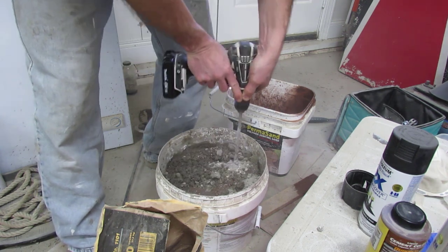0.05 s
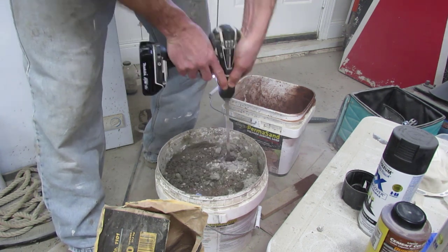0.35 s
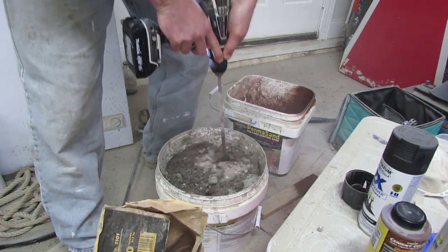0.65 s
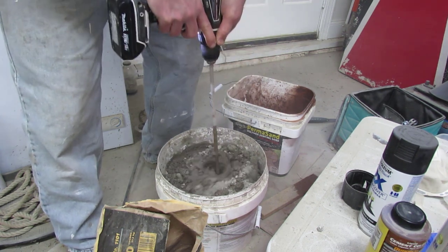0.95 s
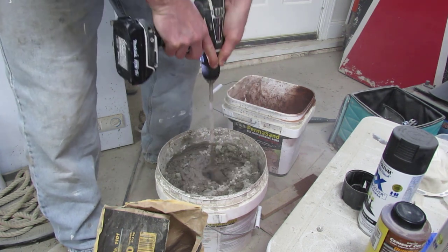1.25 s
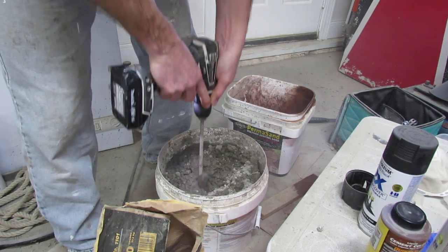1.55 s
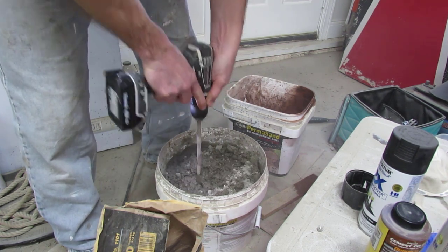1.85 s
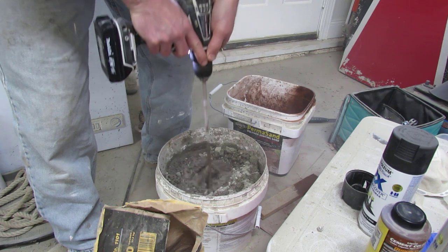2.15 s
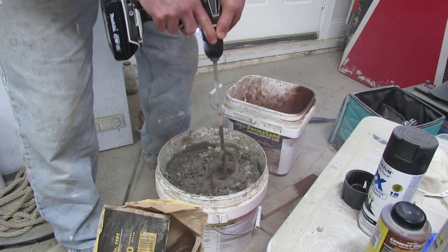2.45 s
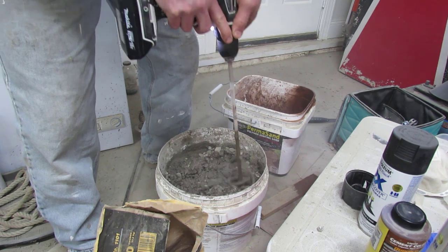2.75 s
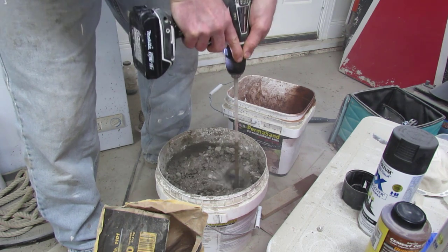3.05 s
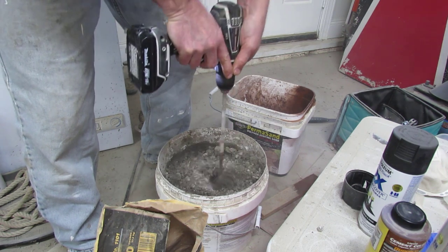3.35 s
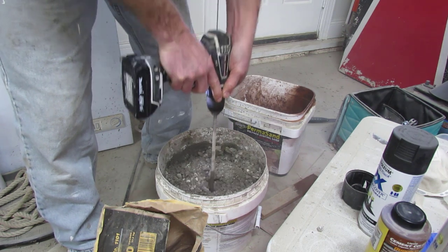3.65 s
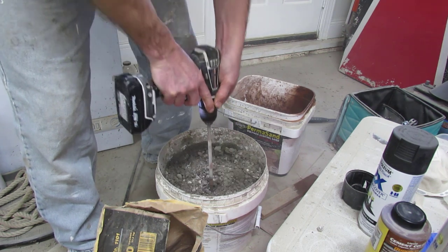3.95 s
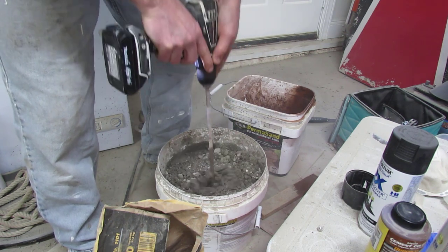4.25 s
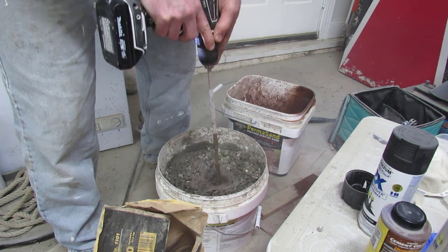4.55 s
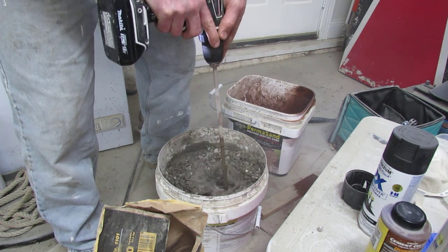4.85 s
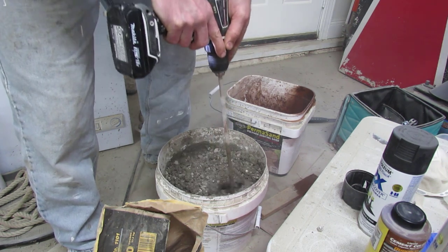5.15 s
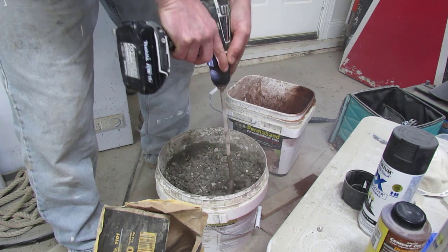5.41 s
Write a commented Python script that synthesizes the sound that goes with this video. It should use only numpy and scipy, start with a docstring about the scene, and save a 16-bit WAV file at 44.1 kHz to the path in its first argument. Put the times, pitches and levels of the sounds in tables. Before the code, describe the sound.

Wet concrete churns in a plastic bucket as a drill's gear whine rises and sags, with occasional paddle knocks and scrapes.

```python
"""A cordless drill turns a mixing paddle through wet concrete in a plastic bucket, in a garage.
Its gear teeth whine and rattle, rising and sagging with the trigger and the drag of the mix.
At part throttle the speed control chops the current, so the motor buzzes at a steady pitch.
Gravel churns, the bucket rumbles, and the paddle knocks and scrapes against the bucket wall.
The garage adds a short echo and a faint hum."""
import sys
import numpy as np
from scipy import signal
from scipy.io import wavfile
from scipy.ndimage import uniform_filter1d

SR = 44100
rng = np.random.default_rng(int(sys.argv[2]) if len(sys.argv) > 2 else 0)


def inscribe(sig):
    """Save sig as 16-bit PCM at rate SR to the path in sys.argv[1].

    A 1-D sig is mono; a 2-D sig holds one channel per row.
    Samples are clipped to [-1, 1] before scaling.
    """
    pcm = np.round(np.clip(np.atleast_2d(sig).T, -1, 1) * 32767)
    wavfile.write(sys.argv[1], SR, pcm.astype(np.int16))


N = 246078
TIME = np.arange(N) / SR

# The tone colour of four noises. Each row: frequency in Hz, level in dB.
AIR_SPECTRUM = [(30, 1.5), (90, -19), (150, 9.5), (330, -22), (1000, -3), (2200, -3), (8500, -37),
                (15000, -47)]
RUMBLE_SPECTRUM = [(30, -14), (70, -25), (140, 2.5), (290, 3.5), (450, 8), (800, 1), (2000, -29)]
CHURN_SPECTRUM = [(250, -34), (450, -23), (720, -1), (1000, 1), (1500, 3.5), (2000, 5), (3000, 0),
                  (5000, -5), (10000, -31)]
RATTLE_SPECTRUM = [(500, -22), (1200, -4.5), (2400, -4), (3150, 0), (3800, -3), (4700, -0.5), (5500, 0),
                   (6600, -0.5), (8000, -1.5), (9500, -4.5), (12500, -11), (15500, -18.5)]
# How alike left and right are. Each row: frequency in Hz, likeness (1 is identical).
STEREO_LIKENESS = [(40, 0.14), (120, 0.82), (1000, 0.95), (2200, 0.59), (4500, 0.73), (12000, 0.75)]
# Resonances of the housing and the bucket's mouth. Each row: frequency in Hz, boost in dB, sharpness (Q).
RESONANCES = [(542, -0.5, 7.2), (765, 3, 6.8), (940, -1, 4), (1170, -0.5, 8.8), (2050, -1, 7),
              (2320, 0, 8.1), (3960, -0.5, 7)]

# The ringing notes (modes) of the bucket wall, the filled bucket and the steel blade.
# Each row: pitch in Hz, level in dB, seconds to fade by 60 dB.
WALL_MODES = [(650, -5.5, 0.018), (1072, -4, 0.0098), (1444, -4, 0.039), (2050, -22, 0.0062),
              (3170, -8.5, 0.017)]
BODY_MODES = [(170, 5.5, 0.11), (274, -8.5, 0.057), (464, -20, 0.15)]
BLADE_MODES = [(1034, -2, 0.036), (1248, -2, 0.032), (2780, -10, 0.039)]
# A deep blow favours other notes. One change in dB for each body mode, at full depth.
DEEP_BLOW_CHANGES = [-13, 9, 16]
# The paddle hits the wall. Each row: time in seconds, then crunch, wall ring and thump in dB.
WALL_KNOCKS = [(0.055, -30, -34, -35), (0.165, -26.5, -48, -36), (1.663, -24, -33, -30),
               (1.678, -25.5, -31, -32), (1.722, -26, -33, -40), (1.736, -27, -22, -28),
               (1.751, -21, -19.5, -26.5), (1.778, -32.5, -36, -48), (2.66, -27, -36, -45),
               (2.67, -17, -27, -33), (2.713, -21.5, -33, -55.5), (2.753, -24.5, -30, -54),
               (2.761, -24, -41, -56), (2.797, -23, -32, -52), (3.29, -28, -23.5, -55),
               (3.837, -38.5, -43, -24.5), (3.856, -32, -24.5, -40), (3.868, -25, -26, -47),
               (5.198, -25, -38, -41), (5.31, -22, -19, -46), (5.319, -29.5, -22, -50),
               (5.397, -33, -21, -45), (5.474, -30, -19, -45), (5.496, -29, -23, -46),
               (5.522, -21.5, -34, -46)]
# The paddle drags along the wall. Each row: start and end in seconds, level in dB.
WALL_DRAGS = [(2.934, 2.946, -29), (3.29, 3.335, -38), (5.337, 5.582, -28.5)]
# A stone catches the blade. Each row: time in seconds, level in dB.
BLADE_CLANKS = [(2.667, -27), (2.758, -18.5), (2.779, -29), (5.308, -29)]
# The paddle digs into gravel. Each row: start and end in seconds, then extra gearbox, churn, rumble in dB.
GRAVEL_DIGS = [(0, 0.19, 0.5, 4, 3.5), (1.667, 1.75, 5, 8, 9), (3.84, 3.87, 1.5, 6, 7.5),
               (5.066, 5.199, 0.5, 4, 8), (5.312, 5.58, -2.5, 2, 5)]
# How deep the paddle is held. Each row: time in seconds, depth from 0 to 1.
PADDLE_DEPTH = [(0, 1), (.7, 0.1), (1.15, 0.15), (1.5, 0.84), (1.9, 1), (2.55, 0.02), (3.1, 0.26),
                (3.7, 0.84), (4.2, 0.72), (4.7, 0.1), (5.3, .1), (5.58, 0.89)]
# The drag of the mix on the paddle. Each row: time in seconds, load in dB.
MIX_LOAD = [(0, 0.5), (.42, -6), (.84, -1.5), (.98, -1.5), (1.22, 1), (1.7, -2), (1.86, -4.5),
            (1.98, -10.5), (2.05, -9), (2.1, 0), (2.55, 2.5), (3.22, 1.3), (3.36, -1.5), (3.78, -2.5),
            (4.08, 0), (4.55, 2), (5.15, 5), (5.58, 8)]

# Motor speed, set by the trigger. Each row: time in seconds, pitch of the gear whine in Hz.
MOTOR_SPEED = [(0, 2500), (.11, 1748), (.2, 2510), (.25, 1353), (.53, 1148), (.8, 1633), (1.11, 1745),
               (1.16, 2082), (1.2, 2593), (1.42, 2860), (1.5, 3065), (1.665, 3130), (1.7, 2464),
               (1.83, 2350), (1.86, 2007), (1.93, 1104), (2.0, 593), (2.05, 799), (2.1, 1485), (2.58, 1655),
               (2.73, 1982), (2.99, 1750), (3.015, 2315), (3.13, 2300), (3.18, 2956), (3.24, 3144),
               (3.27, 2974), (3.38, 3006), (3.46, 3275), (3.56, 3139), (3.81, 3117), (3.84, 2620),
               (3.875, 2395), (3.9, 2686), (3.96, 2300), (4.02, 2240), (4.07, 1521), (4.24, 1615),
               (4.28, 2128), (4.6, 2266), (4.9, 2243), (5.06, 2106), (5.13, 1802), (5.29, 1725),
               (5.58, 1510)]
# The motor's buzz. One level in dB for each harmonic, from the second upwards.
BUZZ_HARMONICS = [-16, -14, -3.5, -14, -7.5, -1, -14]
# How strong the whine is. Each row: time in seconds, dB relative to the gearbox level.
WHINE_LEVELS = [(0, -4.5), (.1, -14), (.19, -8), (.33, -18), (.6, -8), (.8, -4.5), (1.02, -10), (1.12, -11),
                (1.25, -10), (1.62, -8), (1.73, -5), (1.82, -1), (1.89, -5), (2.1, -17), (2.5, -6.5),
                (2.65, -14), (2.8, -12), (2.91, -4), (2.95, 2), (2.99, -8), (3.03, -6), (3.12, -4),
                (3.2, -5), (3.25, 2.5), (3.29, 0), (3.5, -4), (3.58, -0.5), (3.8, -3), (3.98, -4.5),
                (4.13, -3.5), (4.3, -3.5), (4.44, -6), (4.5, -9), (4.66, -7), (4.88, -7.5), (5.04, -6),
                (5.11, -10), (5.17, -3), (5.28, 3), (5.33, -1), (5.45, 1), (5.52, -13), (5.58, -0.5)]
# Low gear tones. Each row: multiple of the whine's pitch, dB relative to the gearbox level at full speed.
GROWL_TONES = [(.2, -26.5), (.255, -20)]
# Gear tones that sing out for a while.
# Each row: start and end in seconds, multiple of the whine's pitch, dB relative to the gearbox level.
SINGING_TONES = [(0.681, .95, .93, -7), (0.85, 1.029, 2, -14), (.8, 1.08, 2.78, -15),
                 (1.185, 1.557, .5, -12), (1.46, 1.65, .25, -15), (1.219, 1.444, 1.45, -12.5),
                 (1.319, 1.439, 2, -7), (1.49, 1.667, 1.53, -6), (1.781, 1.85, 2.42, -13),
                 (2.119, 2.601, .5, -21), (3.192, 3.796, 1.5, -13), (3.197, 3.383, .57, -12.5),
                 (3.2, 3.4, 2.2, -22), (3.406, 3.53, .525, -8), (3.416, 3.548, 2.1, -5.5),
                 (3.556, 3.82, .5, -5.5), (3.583, 3.801, 2, -10.5), (3.595, 3.737, .2, -12),
                 (4.399, 4.445, .5, -8.5), (4.5, 4.851, .49, -19), (4.499, 4.999, 1.47, -17),
                 (4.502, 4.972, 1.96, -11), (4.5, 4.92, 2.46, -11.5)]

FULL_SPEED_HZ, CHOP_HZ = 3100, 116.2  # the whine at full speed; how often the current is chopped
WHINE_PER_GEAR_PULSE = 32  # whine cycles in one pulse of the gears (a turn of the gear carrier)
WHINE_PER_PADDLE_TURN = 136
SCRAPE_S = 0.0051  # how quickly a knock's scrape rises and fades


def from_db(db):
    """Turn decibels into a gain."""
    return np.exp(np.asarray(db) * (np.log(10) / 20))


def rms_one(x):
    """Scale a signal to an average power of 1."""
    return x / np.sqrt(np.mean(np.abs(x) ** 2) + 1e-20)


def in_time(rows):
    """Join (seconds, value) points into a value for every sample."""
    return np.interp(TIME, *np.transpose(rows))


def at_hz(points, hz):
    """Read between (Hz, value) points, with octaves evenly spaced."""
    f, value = np.transpose(points)
    return np.interp(np.log(hz), np.log(f), value)


def filtered(x, order, hz, kind):
    """Keep the low part, the high part or one band of a sound."""
    return signal.sosfilt(signal.butter(order, hz, kind, fs=SR, output="sos"), x)


def drift(rate):
    """A smooth random wander of about 1, changing about `rate` times a second."""
    step, warm_up = 20, 4000  # samples per point; points thrown away
    r = np.exp(-2 * np.pi * step * rate / SR)
    slow = signal.lfilter([1], [1, -2 * r, r * r], rng.standard_normal(N // step + warm_up + 2))[warm_up:]
    return np.interp(np.arange(N) / step, np.arange(len(slow)), rms_one(slow))


def swell(start, end, attack_s, release_s):
    """A level that rises to 1 at `start`, holds until `end` and dies away."""
    return np.exp(np.minimum(TIME - start, 0) / attack_s - np.maximum(TIME - end, 0) / release_s)


def spread(mid, side, alike):
    """Make left and right from a shared signal and one they take with opposite signs."""
    return np.sqrt(1 + alike) * mid + np.sqrt(1 - alike) * side * np.array([[1], [-1]])


def coloured_noise(spectrum, bands, force=1, flicker_db=0):
    """Stereo noise that follows a contact force, built from bands that can each flicker."""
    out = np.zeros((2, N))
    white = rng.standard_normal((2, 2, N)) * force
    edges = np.geomspace(spectrum[0][0], spectrum[-1][0] * 1.1, bands + 1)
    for k, (low, high) in enumerate(zip(edges, edges[1:])):
        hz = np.sqrt(low * high)
        alike = at_hz(STEREO_LIKENESS, hz)
        band = filtered(white[k % 2], 2, [low, high], "band") * np.sqrt([[1 + alike], [1 - alike]])
        flicker = flicker_db * drift(13) if flicker_db else 0
        out += band * from_db(at_hz(spectrum, hz) + flicker)
    return rms_one(spread(*out, alike=0))


def contacts(per_s, size_db, length_s, smooth):
    """The force of many tiny random hits of uneven size, on top of some smooth sliding."""
    sizes = from_db(size_db * np.minimum(rng.exponential(1, N), 4))
    hits = rng.random(N) < per_s / SR
    energy = signal.lfilter([1], [1, -np.exp(-1 / (length_s * SR))], hits * sizes ** 2)
    return np.sqrt(smooth + energy / energy.mean())


def taps(rows):
    """One clean blow for each (seconds, dB), as strong as a whole scrape of that level."""
    force = np.zeros(N)
    for s, db in rows:
        force[int(s * SR)] += from_db(db) * np.sqrt(SCRAPE_S * SR)
    return force


def ring(force, modes):
    """A force sets an object ringing: each mode is a note that fades."""
    out = 0
    for k, (hz, db, t60) in enumerate(modes):
        r, w = np.exp(-np.log(1000) / (t60 * SR)), 2 * np.pi * hz / SR
        note = signal.lfilter([0, np.sin(w) * np.sqrt(1 - r * r)],
                              [1, -2 * r * np.cos(w), r * r], force + 1e-18)
        out = out + (-1) ** k * from_db(db) * note
    return out


def resonate(x):
    """The housing and the bucket's mouth lift or dip a few narrow bands."""
    for hz, db, q in RESONANCES:
        w, gain = 2 * np.pi * hz / SR, from_db(db / 2)
        width, centre = np.sin(w) / (2 * q), -2 * np.cos(w)
        x = signal.lfilter([1 + width * gain, centre, 1 - width * gain],
                           [1 + width / gain, centre, 1 - width / gain], x)
    return x


def garage_air():
    """The quiet air of the garage, with a faint low hum."""
    hum = from_db(-71.5) * np.sin(2 * np.pi * 49 * TIME + .5 * drift(2))
    air = from_db(-47) * coloured_noise(AIR_SPECTRUM, bands=11)
    return (hum + air) * from_db([[.5], [-.5]])  # a little to the left


def garage_echo(x, t60):
    """Sound bounces between walls: six repeating echoes a side, fading by 60 dB in `t60` seconds."""
    out = np.zeros((2, N))
    for k, lag in enumerate((rng.uniform(.011, .045, 12) * SR).astype(int)):
        loop = x[k % 2].copy()
        gain = np.exp(-np.log(1000) * lag / SR / t60)
        for i in range(lag, N, lag):
            loop[i:i + lag] += gain * loop[i - lag:i][:N - i]
        out[k % 2] += (loop - x[k % 2]) * (-1) ** (k // 2)
    return out


def wet_concrete(churn_db, rumble_db):
    """Stones click together in the wet mix, and the bucket rumbles as they are dragged round."""
    stones = contacts(per_s=380, size_db=2.5, length_s=0.0028, smooth=0.6)
    churn = from_db(churn_db) * coloured_noise(CHURN_SPECTRUM, bands=13, force=stones, flicker_db=1.5)
    rumble = from_db(rumble_db) * coloured_noise(RUMBLE_SPECTRUM, bands=11, force=stones, flicker_db=1.5)
    return resonate(churn * from_db([[-.2], [.2]]) + rumble * from_db([[1.2], [-1.2]]))


def paddle_knocks(depth):
    """Stones caught by the paddle crunch, ring the wall and thump the bucket; some ring the blade."""
    scrapes = np.zeros((2, N))
    for s, *levels_db, _ in WALL_KNOCKS:
        near = slice(max(0, int((s - .06) * SR)), int((s + .06) * SR))
        scrapes[:, near] += from_db(levels_db)[:, None] * np.exp(-np.abs(TIME[near] - s) / SCRAPE_S)
    crunch_level, wall_level = scrapes
    for start, end, db in WALL_DRAGS:
        wall_level += from_db(db) * swell(start, end, attack_s=0.01, release_s=0.015)
    grit = contacts(per_s=1200, size_db=2.5, length_s=0.0003, smooth=0.6)
    grinding = rms_one(spread(*(rng.standard_normal((2, N)) * grit), alike=0.83))
    crunch = crunch_level * rms_one(filtered(grinding, 1, [900, 5500], "band"))
    wall = ring(grinding * wall_level, WALL_MODES)
    thumps = taps([(s, db) for s, *_, db in WALL_KNOCKS])
    thumps = filtered(thumps, 1, 120, "high")  # keep deep bass out of the thumps
    body = sum((-1) ** k * ring(thumps * from_db(DEEP_BLOW_CHANGES[k] * depth), [mode])
               for k, mode in enumerate(BODY_MODES))
    blade = ring(taps(BLADE_CLANKS), BLADE_MODES) * from_db([[-1], [1]])
    return crunch + wall + body + blade


def gravel_digs():
    """Digging into coarse gravel adds a swell, in dB, to the gearbox, the churn and the rumble."""
    return sum(np.outer(extra_db, swell(start, end, attack_s=0.014, release_s=0.054))
               for start, end, *extra_db in GRAVEL_DIGS)


def motor_jolts():
    """How shaken the motor is, from 0 to 1: a harder crunch jolts it more, then it recovers."""
    hardest_db = max(db for _, db, *_ in WALL_KNOCKS)
    return np.tanh(sum(from_db(db - hardest_db) * swell(s, s, attack_s=0.014, release_s=0.1278)
                       for s, db, *_ in WALL_KNOCKS))


def motor_buzz(whine_hz, load_db):
    """Chopped current shakes the motor at a steady rate: most at half throttle, not while it coasts."""
    unchopped_hz, coast_hz_per_s = 3330, 8000  # the whine at full throttle; its fall with the trigger off
    throttle = np.clip(whine_hz / unchopped_hz, 0, 1)
    rise_hz_per_s = uniform_filter1d(np.gradient(whine_hz) * SR, size=1500)
    driven = np.clip(1 + rise_hz_per_s / coast_hz_per_s, 0, 1)
    ripple = 4 * throttle * (1 - throttle) * driven
    phase = 2 * np.pi * CHOP_HZ * TIME
    buzz = sum(from_db(db + 1.8 * drift(6)) * np.sin(k * phase + 0.5 * drift(5))
               for k, db in enumerate(BUZZ_HARMONICS, 2))
    level = from_db(-48.5 + 0.79 * np.minimum(load_db, 2))
    return np.sqrt(2) * ripple * level * buzz * from_db([[.8], [-.8]])


def gear_rattle(whine_hz, cycles):
    """Teeth clash, throbbing with the gears' pulse and the chopped current; faster teeth sound brighter."""
    throb = 1 + 0.057 * np.sin(2 * np.pi * cycles / WHINE_PER_GEAR_PULSE)
    throb += 0.045 * np.sin(2 * np.pi * CHOP_HZ * TIME)
    teeth = throb * contacts(per_s=3500, size_db=3.5, length_s=0.0017, smooth=2.0)
    rattle = resonate(coloured_noise(RATTLE_SPECTRUM, bands=24, force=teeth, flicker_db=1.43))
    dull = filtered(rattle, 1, 8800, "low")
    treble_db = 3 + 14.3 * np.log10(whine_hz / FULL_SPEED_HZ)
    return dull + (rattle - dull) * from_db(treble_db)


def gear_tone(cycles, multiple, pure, uneven, flutter_hz, alike):
    """Meeting teeth make a tone. Uneven teeth make it pulse; slack between them makes it flutter."""
    teeth = np.sin(2 * np.pi * cycles / WHINE_PER_GEAR_PULSE + 2 * drift(3.9))
    phase = 2 * np.pi * multiple * cycles
    cos, sin = np.cos(phase), np.sin(phase)
    mid = pure * cos + np.sqrt(2) * uneven * teeth * np.cos(phase + drift(4.2))
    mid += np.sqrt(.5) * (drift(flutter_hz) * cos + drift(flutter_hz) * sin)
    side = drift(flutter_hz) * cos + drift(flutter_hz) * sin
    return rms_one(spread(rms_one(mid), side, alike))


def gearbox(whine_hz, level_db, jolt):
    """The gears whine, growl and rattle. Their speed stumbles when they are slow or jolted."""
    # The drag of the mix peaks once per paddle turn, slowing the gears and dipping the whine.
    drag = np.sin(2 * np.pi * np.cumsum(whine_hz) / SR / WHINE_PER_PADDLE_TURN + drift(4))
    stumble = (0.00607 * FULL_SPEED_HZ / whine_hz + 0.045 * jolt) * drift(138.1)
    waver = 0.005 * drift(30)  # from uneven drag
    cycles = np.cumsum(whine_hz * (1 + stumble + waver - 0.007 * drag)) / SR
    whine = gear_tone(cycles, 1, pure=0.64, uneven=0.95, flutter_hz=110, alike=0.84)
    whine *= from_db(in_time(WHINE_LEVELS) - 1.8 * drag)
    growl = sum(from_db(db) * gear_tone(cycles, multiple, pure=1, uneven=0.71, flutter_hz=59, alike=0.91)
                for multiple, db in GROWL_TONES)
    growl *= (whine_hz / FULL_SPEED_HZ) ** 2  # unbalance grows with the square of the speed
    singing = 0
    for start, end, multiple, db in SINGING_TONES:
        pure = 0.7 / multiple ** 0.6  # slow gears run more cleanly than fast ones
        tone = gear_tone(cycles, multiple, pure, uneven=0.8, flutter_hz=90 * multiple ** .75, alike=0.9)
        singing += from_db(db) * swell(start, end, attack_s=0.02, release_s=0.0097) * tone
    return from_db(level_db) * (whine + growl + singing + gear_rattle(whine_hz, cycles))


def scene():
    """Drill and bucket in the garage: gears and concrete grow louder with speed, load and digs."""
    whine_hz, load_db, depth = in_time(MOTOR_SPEED), in_time(MIX_LOAD), in_time(PADDLE_DEPTH)
    log_speed = np.log10(whine_hz / FULL_SPEED_HZ)  # 0 at full speed, -1 at a tenth of it
    gear_dig_db, churn_dig_db, rumble_dig_db = gravel_digs()
    gear_db = -24.5 + 24.1 * log_speed + 0.95 * load_db + gear_dig_db
    churn_db = -31.5 + 9.3 * log_speed + 0.6 * load_db + churn_dig_db
    rumble_db = -50 + 11 * log_speed + 0.075 * load_db + rumble_dig_db + 9 * depth
    drill = gearbox(whine_hz, gear_db, motor_jolts()) + motor_buzz(whine_hz, load_db)
    mixing = drill + wet_concrete(churn_db, rumble_db) + paddle_knocks(depth)
    return mixing + from_db(-15) * garage_echo(mixing, t60=0.4) + garage_air()


def record(dry):
    """Cut the treble steeply above 15800 Hz."""
    return signal.sosfilt(signal.ellip(12, .1, 80, 15800, fs=SR, output="sos"), dry)


dry = scene()
out = record(dry)
inscribe(out)
```